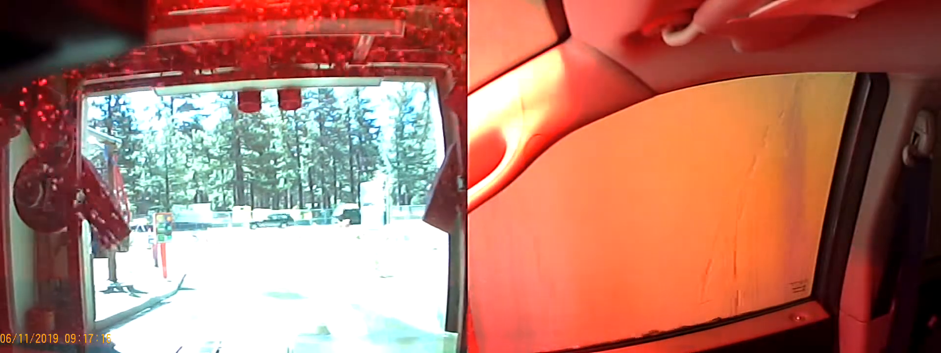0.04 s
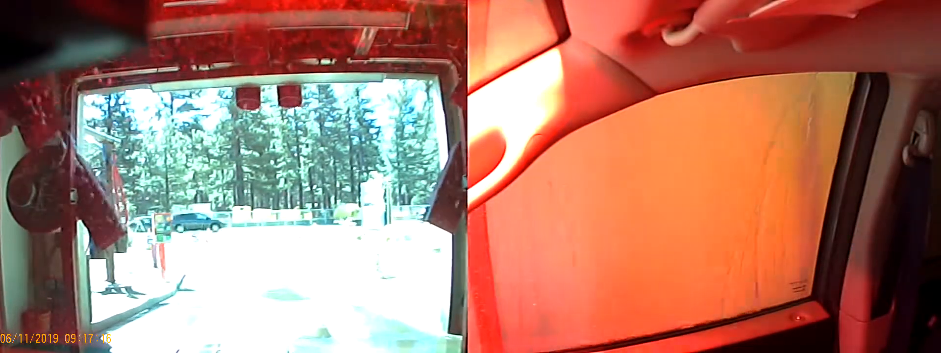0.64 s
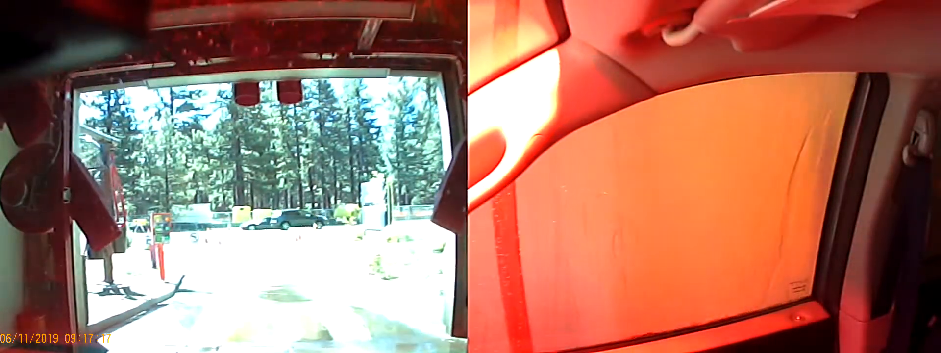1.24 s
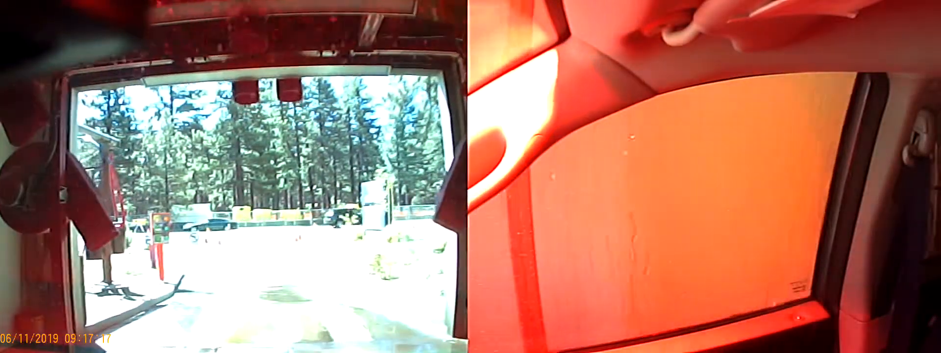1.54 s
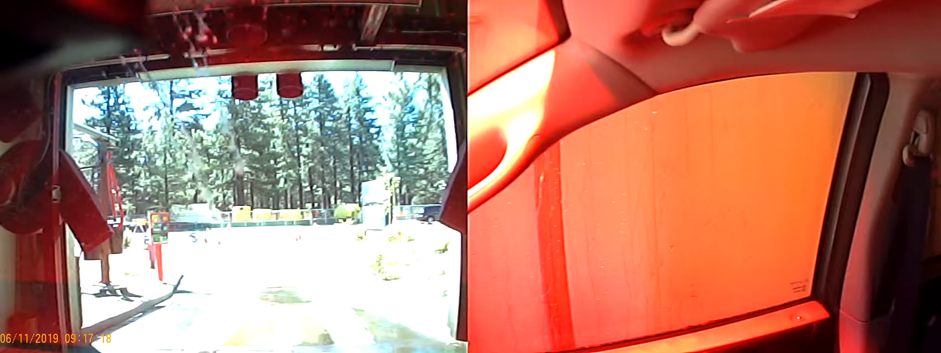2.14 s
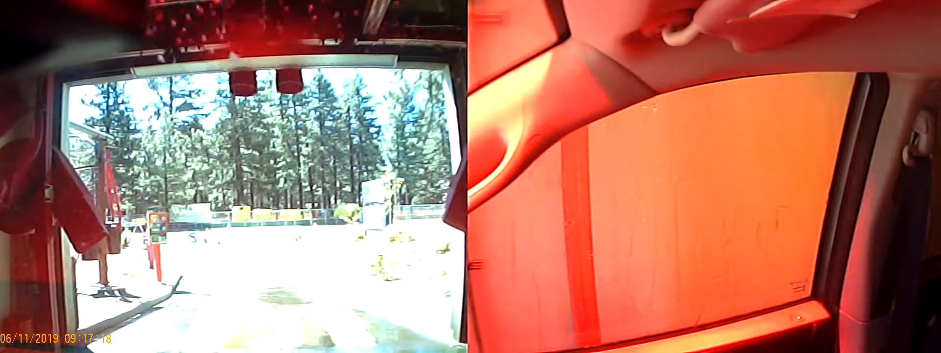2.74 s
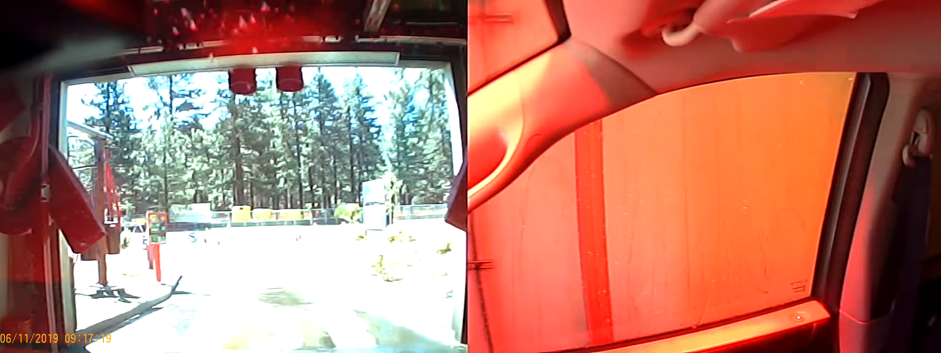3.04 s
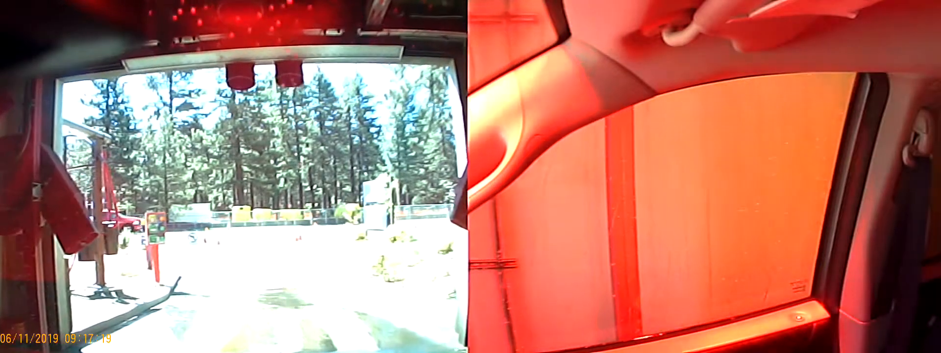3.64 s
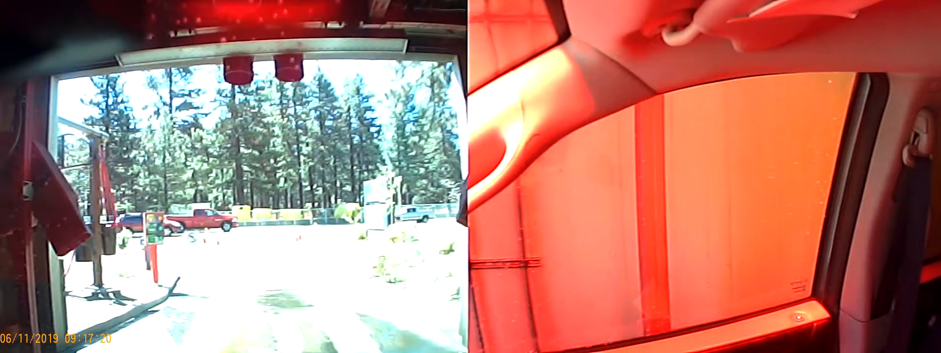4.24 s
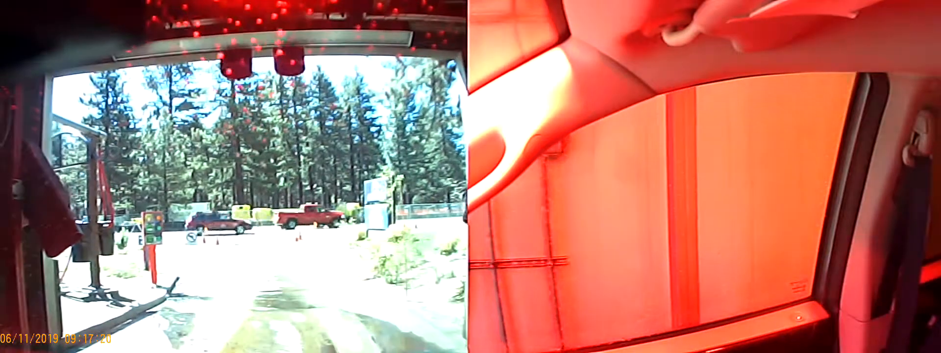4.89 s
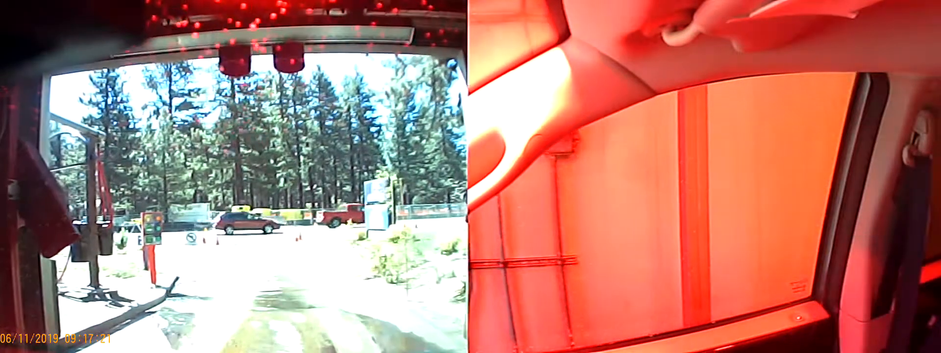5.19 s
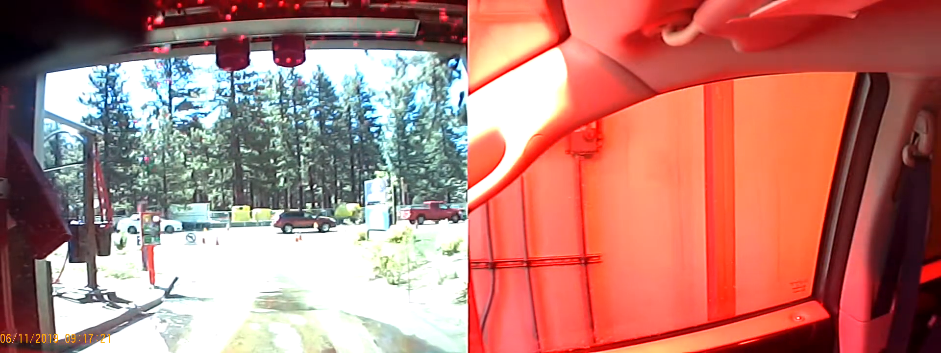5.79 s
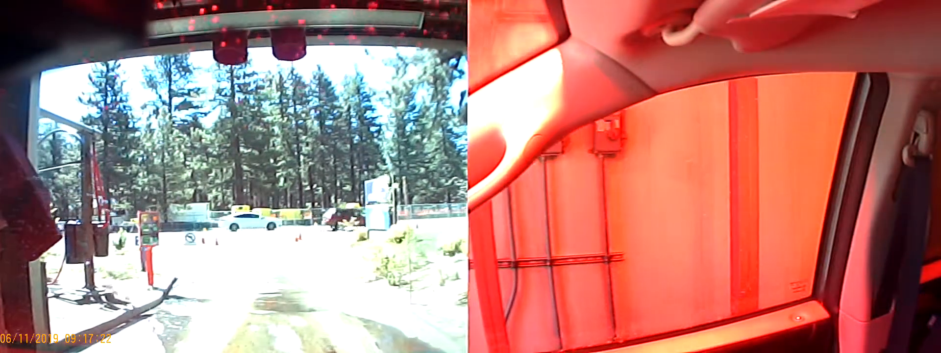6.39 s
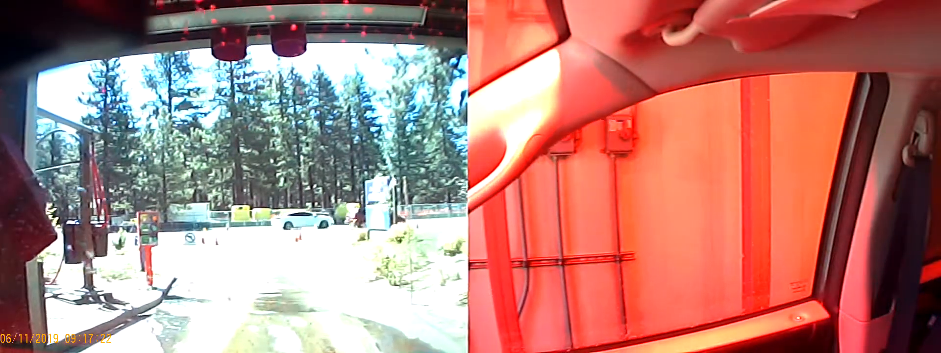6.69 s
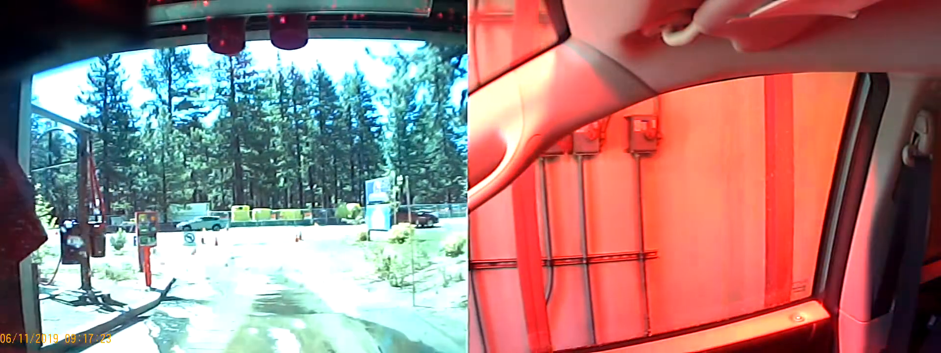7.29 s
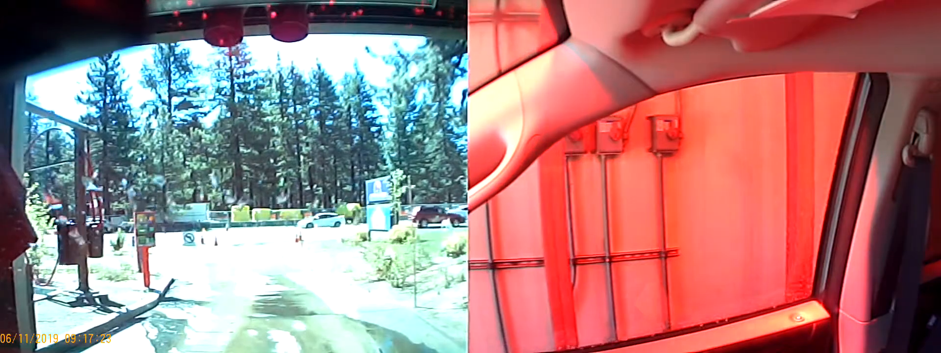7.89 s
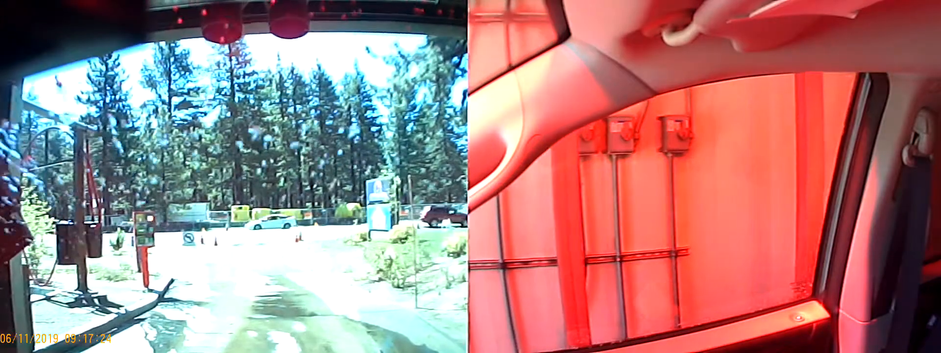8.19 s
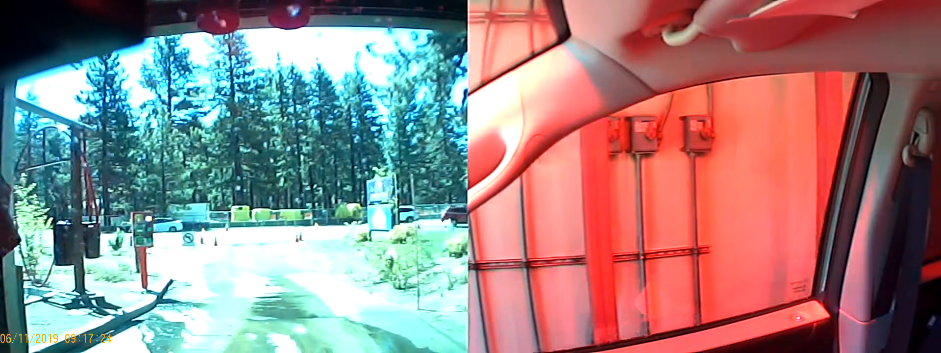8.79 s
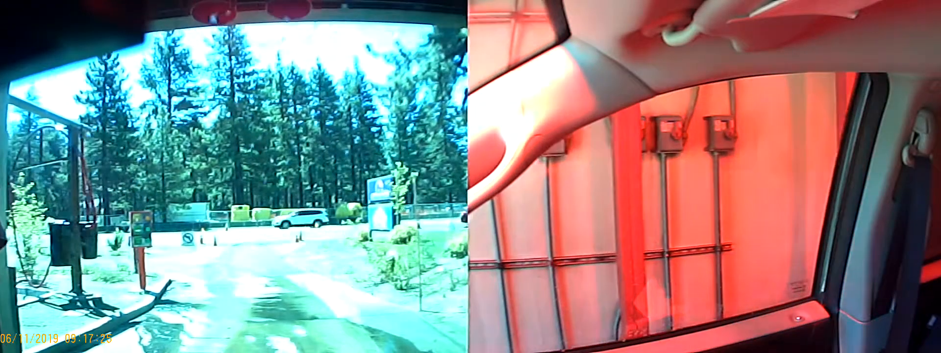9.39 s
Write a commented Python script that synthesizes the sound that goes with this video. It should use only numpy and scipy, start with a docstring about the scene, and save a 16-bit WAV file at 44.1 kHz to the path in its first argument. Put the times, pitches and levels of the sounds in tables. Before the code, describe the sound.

Air blowers in a car wash build to a deep, fluttering roar on a car's roof and windows, ease a little, then build again. Heard from the dashboard of the closed cabin, the air sounds muffled and booming. Quick, uneven clicks from a loose plastic part run through it, along with a soft hiss of blown water, occasional drop ticks, a faint fan hum and a thin electronic whine.

```python
"""Under the car wash dryers

A closed car rolls out under the dryers of an automatic car wash, heard by a dashboard camera.
Air jets buffet the cabin, drum on the roof and rush over the glass; the shaking rattles a loose
plastic part. Blown water hisses and ticks on the windscreen, the fans hum faintly, and the
camera adds a thin whine of its own."""
import sys
import numpy as np
from scipy import signal
from scipy.fft import rfft, irfft, next_fast_len
from scipy.io import wavfile
from scipy.ndimage import uniform_filter1d

SR = 44100
rng = np.random.default_rng(int(sys.argv[2]) if len(sys.argv) > 2 else 0)


def put_to_file(sound):
    """Save the sound as 16-bit audio at rate SR, in the file named by the first command-line argument."""
    columns = np.atleast_2d(sound).T  # one column per channel
    safe = np.clip(columns, -1, 1)
    whole_steps = np.round(safe * 32767)
    wavfile.write(sys.argv[1], SR, whole_steps.astype(np.int16))


N = 425124
TIME = np.arange(N) / SR

# Levels in the tables are relative: the functions may add a gain of their own.
# each dryer passing over the roof: t/s, roof level/dB, glass level/dB, approach/s, retreat/s
DRYER_PASSES = [(4.5, -16.5, -20.5, 0.92, 1.12), (9.3, -18, -25, 0.81, 3.4)]
# a jet catches an edge of the car for a moment: t/s, roof lift/dB, glass lift/dB
EDGE_GUSTS = [(0.29, -6, 2.5), (2.42, -0.5, 1.5), (2.86, 5, 0.5), (3.31, 4, 2.5), (3.83, 2.5, 1.5),
              (4.37, 4, 1), (7.94, 0.5, 5), (8.62, 5, 0)]
# buffeting of the cabin, which sets in under the first dryer and stays: t/s, level/dB
BUFFET_LEVELS = [(0, -41.5), (2.5, -37.5), (3.35, -29), (4.55, -33), (5.05, -25.5), (6.35, -29.5),
                 (7.2, -25.5), (9.64, -28)]
# the buffeting briefly loses its grip: t/s, dip/dB
BUFFET_LULLS = [(3.68, -13), (4.2, 0), (5.33, -9), (5.53, -9), (6.59, -3), (8.64, -13)]
# the washing machinery behind the car: t/s, level/dB
RUMBLE_LEVELS = [(0, -32.5), (1.3, -35), (2.2, -44.5), (4, -46), (6.5, -35.5), (9.64, -40)]
# the hardest jolts of the loose part: t/s, first tap level/dB, number of taps
HARD_JOLTS = [(0.065, -25.5, 1), (0.139, -28.5, 1), (0.157, -29.5, 1), (0.202, -28, 1), (0.263, -26, 4),
              (0.364, -30.5, 1), (0.556, -26.5, 1), (0.615, -28, 1), (0.686, -28, 2), (0.723, -25.5, 3),
              (0.809, -26, 3), (1.044, -25.5, 3), (1.147, -27, 2), (1.186, -27.5, 2), (1.247, -27.5, 1),
              (1.303, -32, 1), (1.609, -30.5, 1), (1.867, -27, 1), (2.029, -30, 1), (2.306, -31, 1),
              (3.106, -24.5, 1), (3.128, -29, 1), (3.574, -28, 1), (3.595, -28, 1), (3.891, -26, 1),
              (4.077, -32, 1), (4.255, -28.5, 1), (4.293, -26.5, 1), (4.364, -29.5, 1), (4.399, -33, 2),
              (4.665, -29.5, 1), (4.805, -26.5, 1), (4.924, -27, 5), (5.002, -26, 1), (5.022, -27.5, 1),
              (5.06, -29, 4), (5.29, -26.5, 1), (5.341, -27.5, 1), (5.395, -33, 1), (5.492, -28, 3),
              (5.689, -27, 2), (5.778, -31, 1), (6.071, -29.5, 2), (6.14, -31, 1), (6.216, -26.5, 5),
              (6.505, -30.5, 2), (6.569, -27.5, 1), (6.719, -28.5, 3), (6.822, -26, 4), (6.962, -31.5, 4),
              (7.171, -30, 2), (7.583, -26.5, 1), (7.739, -25.5, 1), (7.933, -28, 2), (8.261, -30, 1),
              (8.317, -28.5, 4), (8.599, -31, 2), (8.839, -25.5, 2), (9.036, -31, 2), (9.126, -27, 3),
              (9.354, -30, 2), (9.541, -28.5, 3)]
# how often lighter jolts come by chance: t/s, rate/(jolts per second)
LIGHT_JOLT_RATES = [(0, 8), (1.25, 8), (1.5, 1.2), (3.6, 0.6), (4.4, 9), (6.9, 8), (7.35, 0.5), (8.1, 10),
                    (9.64, 9)]
# the notes the loose part rings with: f/Hz, level/dB, time to fade by 60 dB/s
PLASTIC_NOTES = [(736, -5, 0.022), (1063, -13.5, 0.033), (1350, -4.5, 0.0089), (1655, 10, 0.0048),
                 (1837, 9, 0.0069), (1997, -5, 0.028), (2740, -14, 0.011), (3160, -22.5, 0.0054),
                 (4340, -26, 0.021), (4923, -18.5, 0.019), (5800, -26, 0.0044), (7550, -30.5, 0.0076)]
# the biggest drops on the windscreen: t/s, level/dB
BIG_DROPS = [(0.5162, -44), (0.7183, -43), (2.0183, -47), (2.6095, -47), (3.7868, -49), (3.8611, -41),
             (4.3765, -47.5), (4.6743, -43), (4.9596, -45), (5.5084, -45), (5.8202, -44), (9.1351, -41)]
# how loud each hiss is as time goes by: t/s, level/dB
SPRAY_LEVELS = [(0, -56.5), (2.2, -55.5), (5.5, -58), (7.5, -56), (7.9, -54.5), (9.64, -55.8)]  # water and air sweeping the windscreen
GLASS_JET_LEVELS = [(0, -87), (1.7, -69), (2.15, -61), (2.7, -62.5), (3.5, -78), (7.45, -67.5),
                    (7.65, -56.5), (8.1, -61), (8.6, -67), (9.64, -76)]  # a jet grazing the windscreen
SIZZLE_LEVELS = [(0, -68), (.3, -73.5), (.5, -70), (2.1, -76), (2.6, -74), (3.2, -74), (4.5, -70),
                 (5.2, -75.5), (9.64, -86.5)]  # a thin sizzle
# lasting tones: f/Hz, level/dB
BLADE_TONES = [(710.6, -54.5), (1421, -60)]  # the fans
CAMERA_TONES = [(8857.8, -63.5), (10367.5, -95)]  # the camera's electronics
# a spectrum says how strong a noise is from low pitch to high: f/Hz, level/dB
BOOM_SPECTRUM = [(12, -30), (25, -11.5), (34, -5), (41, 0.5), (50, -10), (70, -10), (100, -25.5),
                 (160, -59.5)]  # pumped cabin air
ROOF_SPECTRUM = [(55, -44.5), (80, -25), (100, -9.5), (120, 1), (155, -0.5), (180, -2), (220, -18.5),
                 (330, -46)]  # the drumming roof
RUSH_SPECTRUM = [(130, -19), (185, 1.5), (210, -3), (240, 2.5), (280, -5.5), (320, -4), (375, -9.5),
                 (410, -7.5), (490, -12.5), (560, -20.5), (640, -34.5), (900, -56)]  # air over the glass
HOWL_SPECTRUM = [(450, -8.5), (640, -5), (720, 1), (800, 2.5), (870, -5), (960, -20), (1080, -6.5),
                 (1200, -10.5), (1450, -11), (1800, -26.5), (2600, -38.5)]  # jets heard through the seals
RUMBLE_SPECTRUM = [(30, -16), (50, -13.5), (68, -5.5), (88, 1.5), (110, 1), (160, -25.5)]  # washing machinery
SCUFF_SPECTRUM = [(900, 1), (1800, -1), (2800, 2), (3900, -6), (4950, -1.5), (5500, -15), (8000, -18.5),
                  (14000, -21.5)]  # rubbing plastic
SPRAY_SPECTRUM = [(600, -13.5), (1100, 5.5), (1600, -2.5), (2100, 2), (2500, -6.5), (2750, -6.5),
                  (3800, -10), (4200, -15.5), (4400, -9.5), (4650, -19), (4980, -5.5), (5300, -26),
                  (6500, -28), (12000, -49)]  # fine spray
DROP_SPECTRUM = [(1500, -5.5), (4900, 6), (6300, -5.5), (8000, -1), (10800, 0.5), (13000, -8),
                 (15500, -6.5)]  # bursting drops
GLASS_JET_SPECTRUM = [(1800, -10), (2800, -8.5), (3900, 2), (4950, 1.5), (5400, -14.5), (7000, -29)]  # the grazing jet
SIZZLE_SPECTRUM = [(8500, -29.5), (9600, -9.5), (10050, 0.5), (10800, -5.5), (12000, -12.5)]  # the thin sizzle
HISS_SPECTRUM = [(3000, -11), (6800, -10), (8000, -1), (8900, 3.5), (9500, 0), (10100, -3), (11500, -5),
                 (14000, -4.5), (15500, -11.5)]  # the camera's hiss

DRAUGHT_ROOF_DB, DRAUGHT_GLASS_DB = -34, -27.5  # air that blows everywhere in the bay
JET_FALLOFF = 1.27  # how steeply a jet fades with distance
GLASS_LEAD_S = 0.56  # a jet meets the windscreen before the roof
GLASS_LINGER = 1.53  # the rush outlasts the drumming, as the jet goes on along the side windows
BOUNCE_S, BOUNCE_LOSS_DB = 0.0104, 1.2  # from one tap of a jolt to the next


def dryers(roof_db, rush_db):
    """Jets pump the cabin air, drum on the roof, rush over the glass and howl through the seals."""
    lulls_db = sum(dip_db * swell(s, half_width_s=0.055) for s, dip_db in BUFFET_LULLS)
    boom_db = curve(BUFFET_LEVELS) + lulls_db
    boom = jet(BOOM_SPECTRUM, flutter_db=1.5, flutter_hz=23) * gain(boom_db - 0.7)
    roof = jet(ROOF_SPECTRUM, flutter_db=-2.5, flutter_hz=25) * gain(roof_db - 0.05)
    rush = jet(RUSH_SPECTRUM, flutter_db=0.6, flutter_hz=40) * gain(rush_db + 0.2)
    # the howl fills the whole bay, so it swells less than the jet that hits the car
    howl = jet(HOWL_SPECTRUM, flutter_db=1.5, flutter_hz=30) * gain(0.61 * rush_db - 29.5)
    return boom + roof + rush + howl


def jet(spectrum, flutter_db, flutter_hz):
    """Swirling air: noise that flutters quickly but keeps an even average strength."""
    air = noise(spectrum) * gain(flutter_db * wobble(flutter_hz))
    return air / np.sqrt(uniform_filter1d(air ** 2, size=SR // 4))


def blast_levels():
    """Roof and glass levels in dB: each dryer swells and fades over a steady draught, with gusts."""
    roof, glass = gain(DRAUGHT_ROOF_DB) ** 2, gain(DRAUGHT_GLASS_DB) ** 2
    for s, roof_db, glass_db, approach_s, retreat_s in DRYER_PASSES:
        roof += gain(roof_db) ** 2 * nearness(s, approach_s, retreat_s)
        glass += gain(glass_db) ** 2 * nearness(s - GLASS_LEAD_S, approach_s, GLASS_LINGER * retreat_s)
    gusts_db = sum(np.outer(lifts, swell(s, half_width_s=0.041)) for s, *lifts in EDGE_GUSTS)
    return 10 * np.log10([roof, glass]) + gusts_db


def nearness(closest_s, approach_s, retreat_s):
    """The share of a jet's power that reaches the rolling car: 1 when it is closest."""
    distance = (TIME - closest_s) / np.where(TIME < closest_s, approach_s, retreat_s)
    return (1 + distance ** 2) ** -JET_FALLOFF


def rattle():
    """A loose plastic part taps its seat, ringing and scuffing briefly at each touch."""
    t = TIME[:SR // 20]
    # neighbouring notes start in opposite directions, so each tap swells for 2 ms
    notes = np.array([(-1) ** k * gain(db) * np.sin(2 * np.pi * hz * t) * fade(t, fade_s)
                      for k, (hz, db, fade_s) in enumerate(PLASTIC_NOTES)])
    notes /= abs(notes.sum(axis=0)).max()
    strikes = bounces()
    # the part swings back and grazes its seat once more, and now and then in between
    rebounds = clicks(strikes + [BOUNCE_S, -19], scatter_s=0.001)  # 19 dB softer
    grazes = by_chance(2.2 * curve(LIGHT_JOLT_RATES)) * gain(-37.5 + 2 * rng.standard_normal(N))
    taps = clicks(strikes, scatter_s=0.0002) * gain(0.9) + rebounds + grazes
    # the point of contact shifts, so every tap mixes the notes a little differently
    ring = sum(signal.oaconvolve(taps * gain(0.89 * wobble(120)), note)[:N] for note in notes)
    scuff = signal.oaconvolve(taps, fade(t, 0.039))[:N] * noise(SCUFF_SPECTRUM)
    return ring + gain(-21.5) * scuff


def bounces():
    """Each jolt gives one tap or an evenly paced run of weakening taps: rows of t/s, level/dB."""
    # a quarter of the light jolts tap twice
    light_jolts = [(s, -33 + 0.5 * rng.standard_normal(), 1 + (rng.random() < 0.25))
                   for s in TIME[by_chance(curve(LIGHT_JOLT_RATES))]]
    taps = [(s, db, k) for s, db, count in HARD_JOLTS + light_jolts for k in range(round(count))]
    start_s, first_db, bounce = np.transpose(taps)
    uneven_db = 0.3 * rng.standard_normal(len(bounce)) * (bounce > 0)
    return np.column_stack([start_s + bounce * BOUNCE_S, first_db - bounce * BOUNCE_LOSS_DB + uneven_db])


def spray():
    """Fine blown water hisses on the windscreen."""
    mist = rng.standard_normal(N) * gain(1.94 * rng.exponential(size=N))
    return tint(mist, SPRAY_SPECTRUM) * gain(curve(SPRAY_LEVELS) + 7.0 + 0.6 * wobble(25))


def drops(rush_db):
    """Drops burst on the glass in short splashes, more of them in a strong jet."""
    drops_per_s = 45 * unit(gain(rush_db))
    small = by_chance(drops_per_s) * gain(-56 + 2 * np.minimum(rng.exponential(size=N), 5))
    big = clicks(BIG_DROPS, scatter_s=0.0003)
    t = TIME[:SR // 10]
    splash = (1 - np.exp(-t / 0.0014)) * fade(t, 0.039)  # spreads for a moment before it dies
    bursts = signal.fftconvolve(big + small, splash)[:N]
    return gain(-2.5) * bursts * noise(DROP_SPECTRUM)


def machinery():
    """The washing machinery rumbles behind the car."""
    return noise(RUMBLE_SPECTRUM) * gain(curve(RUMBLE_LEVELS))


def fans():
    """The fan blades hum a tone and its octave, wavering as they echo round the bay."""
    wavering_time = TIME + np.cumsum(0.00495 * wobble(22)) / SR
    return sum(tone(hz, db - 2.0 + 3.6 * wobble(9), wavering_time) for hz, db in BLADE_TONES)


def glass_jet():
    """A jet grazing the windscreen hisses brightly."""
    return noise(GLASS_JET_SPECTRUM) * gain(curve(GLASS_JET_LEVELS))


def sizzle():
    """A faint, very high sizzle flickers."""
    return noise(SIZZLE_SPECTRUM) * gain(curve(SIZZLE_LEVELS) - 1.5 + 3 * wobble(70))


def gain(db):
    """Turn decibels into a number to multiply by."""
    return 10 ** (np.asarray(db) / 20)


def unit(x):
    """Scale to an average strength (rms) of 1."""
    return x / np.sqrt(np.mean(x ** 2))


def curve(table):
    """Join a table's points with straight lines in time."""
    return np.interp(TIME, *np.transpose(table))


def swell(peak_s, half_width_s):
    """A smooth rise to 1 and back."""
    return np.exp(-((TIME - peak_s) / half_width_s) ** 2)


def fade(t, fade_s):
    """Die away by 60 dB every fade_s seconds."""
    return np.exp(-np.log(1000) * t / fade_s)


def tone(hz, db, t):
    """A pure tone with an average (rms) level of db."""
    return np.sqrt(2) * gain(db) * np.sin(2 * np.pi * hz * t)


def tint(x, spectrum):
    """Shape a sound with a spectrum that falls away beyond its ends; strength 1."""
    hz, db = np.transpose(spectrum)
    size = next_fast_len(N)
    f = np.maximum(np.arange(size // 2 + 1) * SR / size, 1)
    roll_off = np.minimum(f / hz[0], 1) ** 2 * np.minimum(hz[-1] / f, 1) ** 2
    shape = gain(np.interp(np.log(f), np.log(hz), db))
    return unit(irfft(rfft(x, size) * roll_off * shape, size)[:N])


def noise(spectrum):
    """Noise with the given spectrum; strength 1."""
    return tint(rng.standard_normal(N), spectrum)


def wobble(rate_hz):
    """Glide smoothly through rate_hz random values a second; strength 1."""
    hold = max(int(SR / rate_hz), 2)
    steps = np.repeat(rng.standard_normal(N // hold + 1), hold)
    return unit(uniform_filter1d(uniform_filter1d(steps, hold), hold)[:N])


def by_chance(per_second):
    """Mark random moments, about this many a second."""
    return rng.random(N) < per_second / SR


def clicks(table, scatter_s):
    """One click for each row of t/s, level/dB, a little early or late."""
    s, db = np.transpose(table)
    s = s + scatter_s * rng.standard_normal(len(s))
    samples = np.clip(np.round(s * SR).astype(int), 0, N - 1)
    return np.bincount(samples, gain(db), N)


def scene():
    """Everything that reaches the dashboard, in one channel."""
    roof_db, rush_db = blast_levels()
    machines = dryers(roof_db, rush_db) + machinery() + fans()
    return (machines + rattle() + spray() + drops(rush_db) + glass_jet() + sizzle())[None]


def record(dry):
    """The camera adds its own hiss and electronic whine and cuts the highest treble."""
    whine = sum(tone(hz, db, TIME) for hz, db in CAMERA_TONES)
    hiss = gain(-66.5) * noise(HISS_SPECTRUM)
    end_fades = np.minimum(np.minimum(TIME, TIME[::-1]) / 0.003, 1)
    treble_cut = signal.ellip(10, 0.2, 80, 15550, fs=SR, output="sos")  # above 15550 Hz
    return signal.sosfilt(treble_cut, (dry + whine + hiss) * end_fades)


dry = scene()
out = record(dry)
put_to_file(out)
```